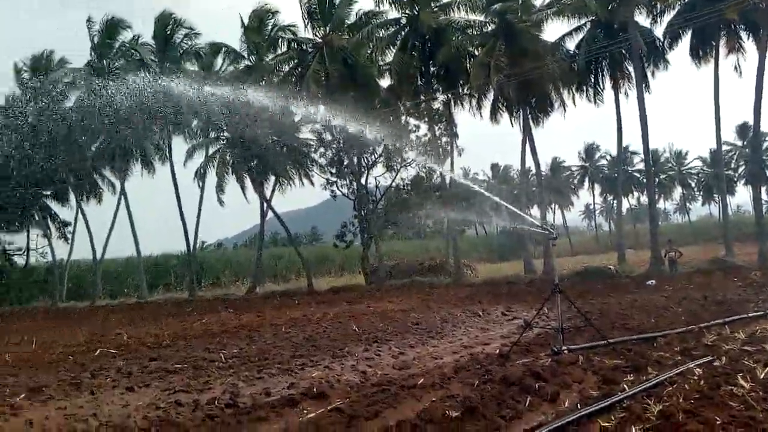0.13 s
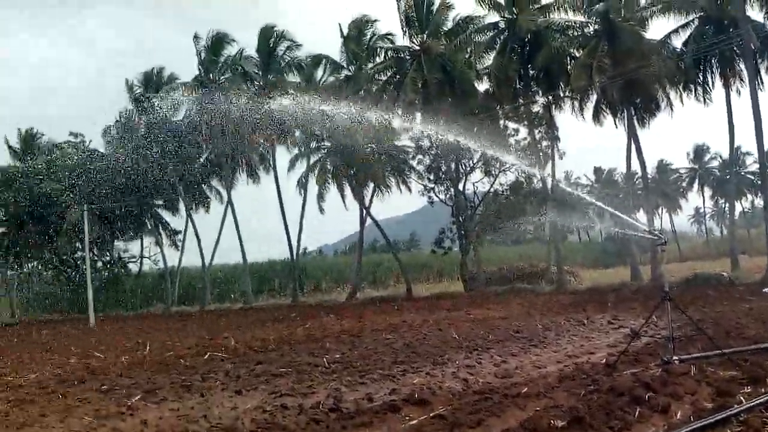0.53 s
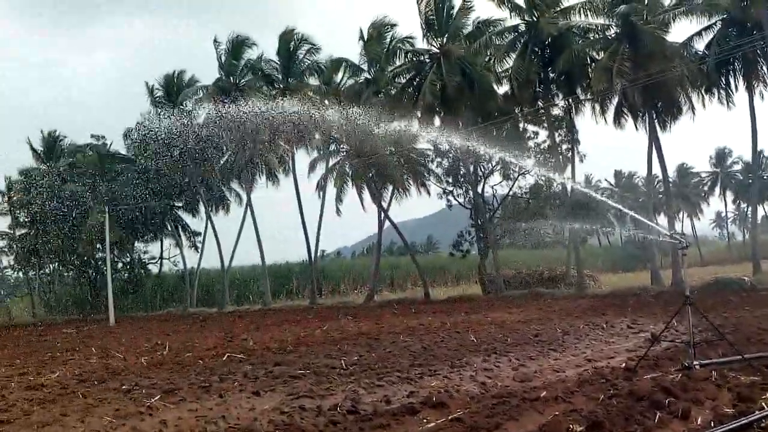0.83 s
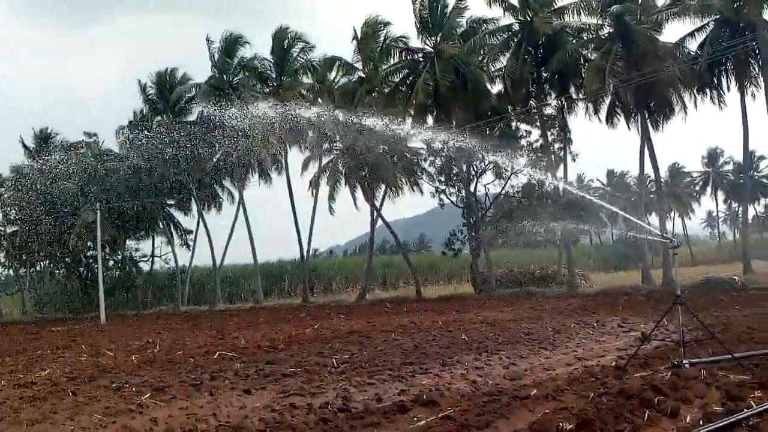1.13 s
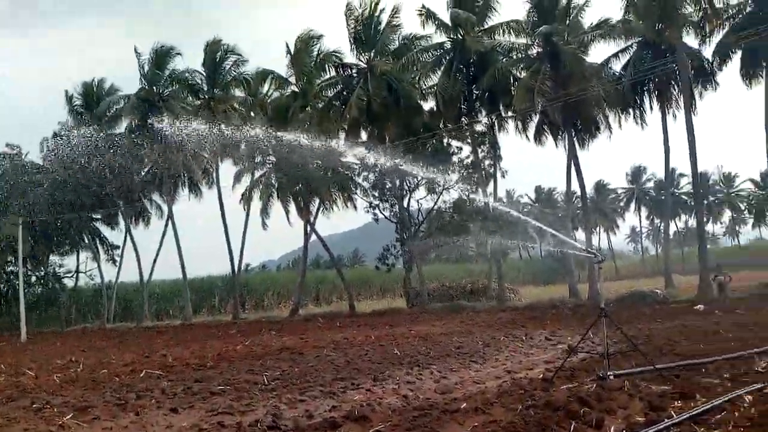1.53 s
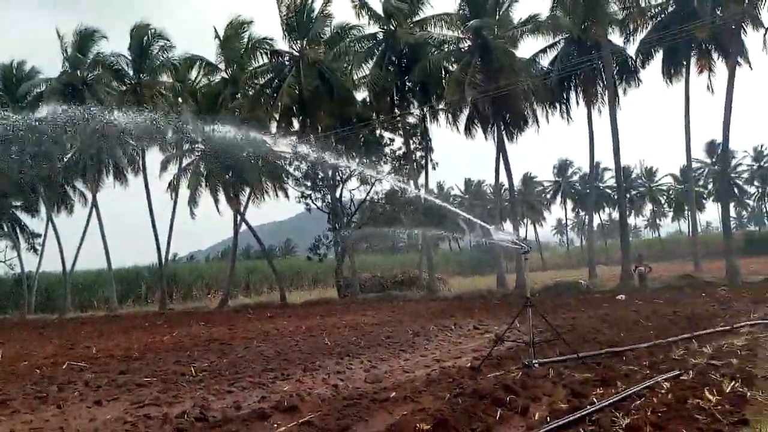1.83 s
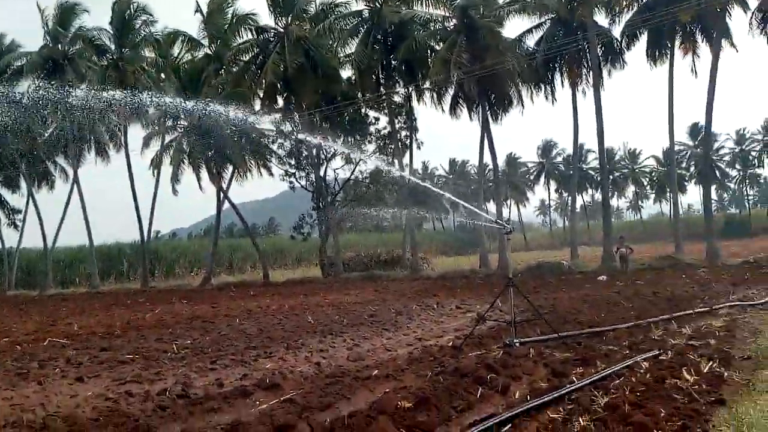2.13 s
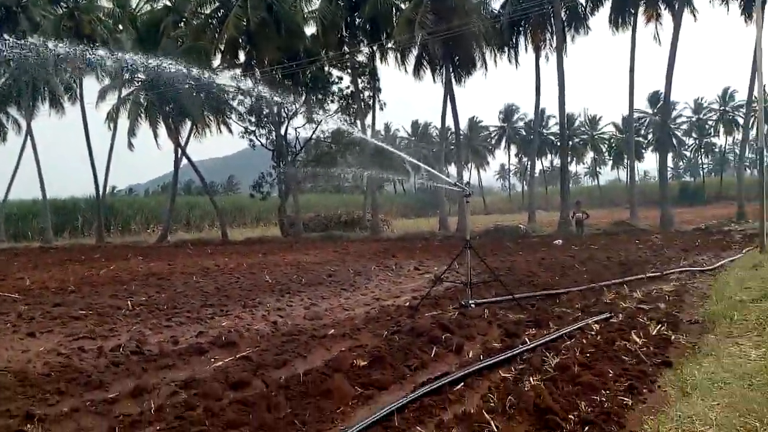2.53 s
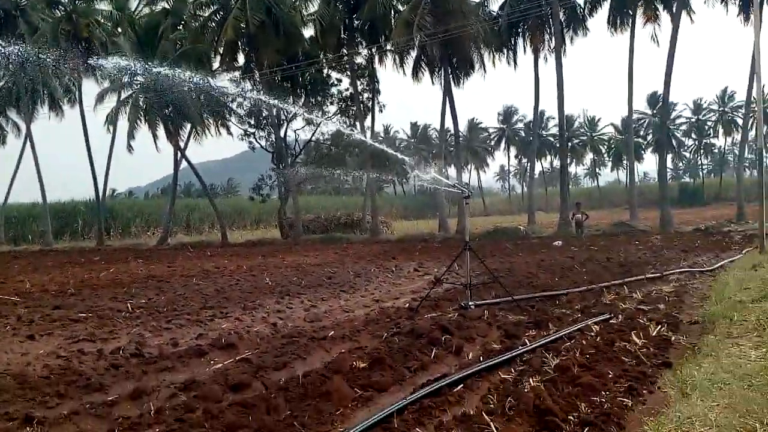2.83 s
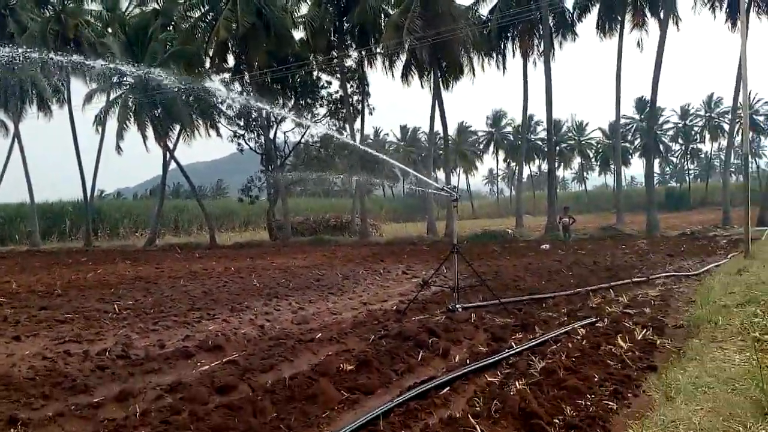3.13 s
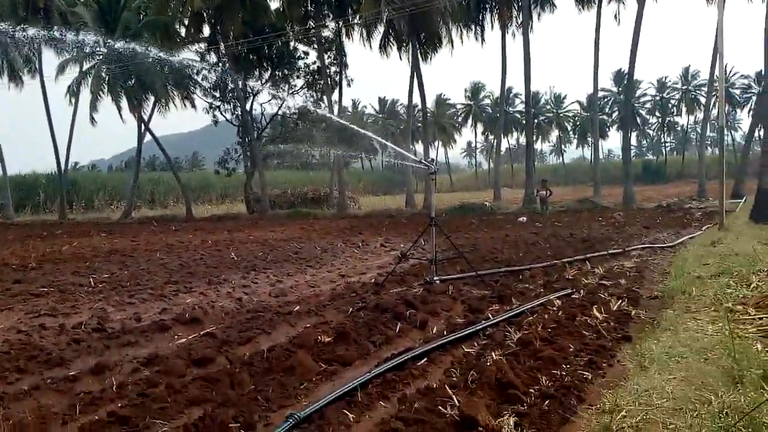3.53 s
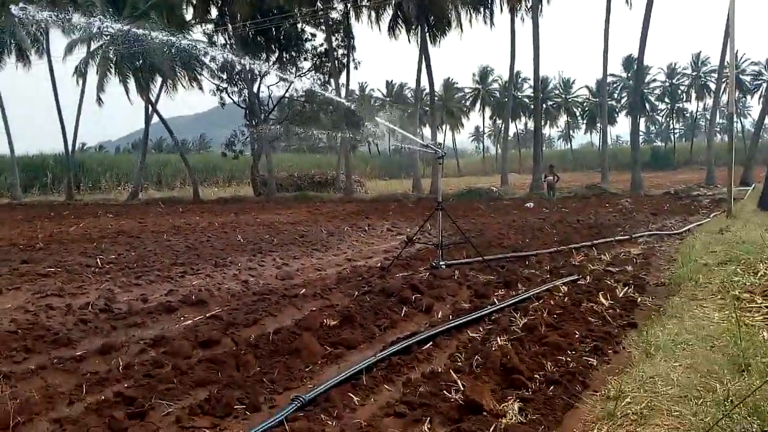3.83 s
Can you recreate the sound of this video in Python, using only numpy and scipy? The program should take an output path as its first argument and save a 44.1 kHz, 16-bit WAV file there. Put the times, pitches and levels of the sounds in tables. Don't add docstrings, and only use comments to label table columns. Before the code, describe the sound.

A large field sprinkler knocks steadily from about 0.5 s, every half second, eight bright metallic clacks of varying hardness, each with a quick rattle and wet splash, the last near 3.8 s. Spray hisses throughout, slowly fading, with small drops ticking, mostly early. Wind rumbles and flaps on both sides, strongest on the right after 2.7 s. A faint far bird chirps at 0.1 and 2.8 s.

```python
import sys
import numpy as np
from scipy import signal
from scipy.fft import rfft, irfft
from scipy.io import wavfile
from scipy.ndimage import uniform_filter1d, map_coordinates

SR = 44100
rng = np.random.default_rng(int(sys.argv[2]) if len(sys.argv) > 2 else 0)


def unload_wav(signal):
    wavfile.write(
        sys.argv[1],
        SR,
        np.round(np.clip(np.atleast_2d(signal).T, -1, 1) * 32767).astype(np.int16),
    )


def boost_factor(decibels):
    exponent = np.asarray(decibels, float) / 20
    return 10 ** exponent


N = 176400

# start_s, level_db, tilt_db_per_octave, main_ring_db, barrel_ring_db
BLOWS = [
    (0.4612, -34, -7, -7, 6.5),
    (0.9421, -33, -2.5, 0, -1),
    (1.4252, -29.5, -2, 3.5, -1),
    (1.9012, -33.5, -5, 5, 3.5),
    (2.3841, -30.5, -4.5, 3.1, -0.36),
    (2.8632, -30, 3, -2.5, 1.5),
    (3.3472, -30.5, 0, 1.2, 2.5),
    (3.8203, -28.5, -1.5, -3, -4),
]
EARLIER_BLOW = (-0.08, -30.5, -9, -6, 4)
# lead_s, level_db
TOUCHES = [
    (.012, -50),
    (0.011, -56),
    (.012, -49),
    (.014, -47.5),
    (.011, -47),
    (0.014, -51),
    (0.015, -49),
    (.013, -50),
    (0.0066, -49.5),
]
# pitch_hz, blow_db, chatter_db, t60_s
ARM_MODES = [(987, -26, 2, 0.033), (1522, -28.5, -21, 0.023), (1783, -8, -23, 0.0271),
             (2123, -4.5, -3.5, 0.011), (3134, -17.5, -13, 0.064), (3410, -18.5, -24, 0.063),
             (4734, -9, -7, 0.02), (5100, -8.5, -10.5, 0.034), (6078, -11.5, -13, 0.049),
             (7260, -15, -25, 0.012)]
MAIN_RING = (4098.5, 7.5, -13, 0.0589)
BARREL_MODES = [(2440, -19.5, -9, 0.13), (2799.6, -22.5, -6.5, 0.16), (5480, -27, -19, 0.16)]
# freq_hz, density_db_per_hz
SPLASH_SPECTRUM = [(600, -24.5), (1000, -1.5), (1300, -3.5), (2600, 2), (4500, 5), (7000, -4),
                   (10000, -25.5), (14500, -16)]
# time_s, lag_s
GUN_LEFT_LAG = [(0, 0.000097), (4, 0.0000083)]
# time_s, level_db
SPRAY_LEVEL = [(0, -48.5), (.3, -46.5), (.7, -49), (1.2, -48.5), (2, -51), (3, -51.5), (4, -53)]
# freq_hz, density_db_per_hz
SPRAY_LEFT = [(500, -9.5), (2200, -10.5), (6000, -15.5), (8000, -20.5), (11000, -29.5), (13000, -32),
              (14300, -26), (15200, -26)]
SPRAY_RIGHT = [(600, -2), (1600, -7), (4000, -1.5), (7200, 1), (9500, -13), (11000, -16.5), (13300, -10.5),
               (14800, -3)]
# start_s, level_db, pitch_hz
DROPS = [(0.0406, -32, 6340), (0.0977, -34.5, 6730), (0.1456, -36, 4140), (0.42, -36, 4800),
         (0.5312, -45, 5720), (0.558, -41, 3740), (0.7385, -37, 7320), (0.8765, -40, 5670),
         (0.9068, -39, 5960), (0.7869, -38, 3940), (0.8172, -31, 4210), (1.0515, -50, 5450),
         (1.066, -38, 5850), (1.1246, -31.5, 6000), (1.2565, -38, 7330), (1.294, -37, 4100),
         (1.338, -44.5, 4150), (1.486, -43, 4200), (1.532, -41, 4190), (1.776, -37, 7200),
         (2.074, -44, 6520), (2.4817, -38.5, 5890), (2.6005, -40, 5460), (2.7464, -40.5, 3950),
         (2.9375, -48, 6300), (3.1344, -42.5, 3370), (3.2301, -45, 3180), (3.5868, -38.5, 3900),
         (3.9285, -49.5, 5590)]
# time_s, level_db
WIND_LEFT = [(0.01, -23.5), (0.39, -27), (1.19, -44), (1.33, -20.5), (1.57, -39), (1.69, -19), (1.85, -59),
             (1.93, -36), (1.99, -59), (2.09, -35.5), (2.25, -54), (2.89, -41), (2.97, -51.5), (3.33, -47),
             (3.45, -65), (3.59, -34), (3.83, -53), (3.99, -57)]
WIND_RIGHT = [(0.01, -23), (0.07, -21.5), (0.17, -31.5), (0.61, -32), (0.75, -24.5), (1.21, -45),
              (1.39, -43), (1.59, -24), (1.97, -21), (2.11, -38.5), (2.25, -26), (2.43, -41.5), (2.81, -14),
              (2.91, -13), (3.09, -41.5), (3.25, -17), (3.59, -27), (3.99, -16)]
# centre_s, extra_db, half_length_s
BUFFETS_LEFT = [(0.259, 6.5, 0.03), (0.662, 12.5, 0.046), (0.795, 8, 0.024), (0.918, 10, 0.011),
                (0.99, -14, 0.02), (1.307, 12.5, 0.017), (1.455, 7, 0.061), (2.29, -4, 0.037),
                (2.595, -13, 0.019), (2.643, 9, 0.027), (3.694, -2, 0.025)]
BUFFETS_RIGHT = [(0.329, 8, 0.0121), (.89, -3.5, 0.026), (1.13, -4, 0.019), (2.234, -12.5, 0.014),
                 (2.254, 14.5, 0.005), (2.62, 6.5, 0.016), (2.688, -9.5, 0.038), (2.858, -9, 0.03),
                 (2.921, 8.5, 0.0036), (2.947, -17.5, 0.013), (3.16, 3, 0.048), (3.732, 6.5, 0.021),
                 (3.976, -6.5, 0.0082)]
# freq_hz, density_db_per_hz
EDDIES = [(20, -32), (43, -4.5), (90, 3.5), (200, -4), (300, -11.5), (450, -24), (650, -34.5), (1200, -74)]
# start_s, level_db, left_minus_right_db, eddy_pitch_hz
SLAPS = [(0.074, -31, -8.5, 261), (0.103, -36, 5.5, 261), (0.175, -26, 18.5, 314), (0.218, -30, 14.5, 266),
         (0.269, -26, 12.5, 297), (0.521, -46, 9.0, 326), (0.581, -36.5, 13.5, 315),
         (0.624, -27.5, 14.0, 261), (0.646, -29.5, 13.0, 306), (0.732, -41, -14.5, 310),
         (0.766, -42, 1.5, 382), (1.239, -43, 15.5, 347), (1.27, -29, 31.5, 441), (1.29, -20.5, 42.5, 340),
         (1.582, -27, -6.5, 260), (1.613, -20.5, 6.0, 264), (1.683, -24.5, 15.5, 296),
         (1.79, -30, -28.0, 261), (1.816, -32.5, -37.0, 258), (1.847, -33, -38.5, 328),
         (1.978, -41, -34.0, 296), (2.062, -41, -16.5, 318), (2.246, -30.5, -37.0, 264),
         (2.313, -36.5, -28.5, 364), (2.59, -36.5, -31.0, 272), (2.712, -34.5, -23.0, 294),
         (2.764, -21, -48.0, 277), (2.853, -31, -26.0, 339), (2.883, -24, -30.5, 313),
         (2.908, -22, -45.5, 372), (2.955, -39.5, -32.5, 371), (2.97, -27, -41.5, 417),
         (2.996, -32, -35.0, 260), (3.14, -39, -27.5, 354), (3.282, -23, -43.5, 263),
         (3.332, -18, -37.0, 333), (3.359, -21, -32.0, 272), (3.42, -23, -50.0, 341),
         (3.474, -31.5, -40.0, 320), (3.506, -33.5, -23.0, 277), (3.599, -38, -18.5, 334),
         (3.676, -38, -18.5, 261), (3.702, -36, -35.5, 261), (3.769, -18.5, -50.0, 324),
         (3.824, -23, -28.5, 291), (3.885, -18, -48.0, 338), (3.919, -21, -51.5, 331),
         (3.969, -26.5, -42.5, 262)]
# start_s, length_s, start_hz, end_hz, level_db
BIRD = [
    (.113, .035, 4000, 3500, -55),
    (.165, .09, 2930, 2850, -59),
    (2.768, .045, 3900, 3600, -60),
    (2.815, .12, 3050, 2830, -61),
]

BLOW_RISE_S, BLOW_DB, SPREAD_DB = 0.006, 4.5, 4.5
REBOUND_S, REBOUND_DB = 0.0045, -3.5
MAIN_REBOUND_LOSS_DB = 12
CHATTER_PER_S, CHATTER_DB, CHATTER_START_S, CHATTER_T60_S = 2500, -18.5, 0.012, 0.094
SPLASH_DB, SPLASH_T60_S, SPLASH_LEAD_DB, SPLASH_HOLD_S = -13, 0.1, -11, 0.042
GUN_LEFT_DB, GUN_LEFT_CUT_HZ, GUN_RIGHT_DB = -2.5, 1770, -0.5
PATCHY_DB, PATTER_PER_S, PATTER_SIZE_DB, PATTER_DB = 1.35, 400, 3.5, -5
DROP_T60_CYCLES, DROP_DB, DROP_LEFT_DB = 10, 3, -9
BRIGHTEN_DB_PER_OCT, MEAN_WIND_DB = 0.2566, -26.5
LUMPS_DB, LUMPS_HZ, LUMP_TILT_PER_OCT, OWN_DB = 2, 42.3, 0.37, 1.3
EVEN_CYCLES, EVEN_SHARE = 4.97, 0.5
SLAP_DB, SLAP_T60_S, SLAP_RISE_S = 0.14, 0.038, 0.0044
SLAP_LOW_RATIO, SLAP_HIGH_RATIO = 0.43, 1.436
BIRD_LEFT_DB = -9
LIMIT_DB, LIMIT_SHARE, RECOVER_DB_PER_S, CUTOFF_HZ = -9, 0.6, 150, 15900


def in_time(rows):
    return np.interp(np.arange(N) / SR, *np.transpose(rows))


def at_hz(points, hz):
    table_hz, db = np.transpose(points)
    return np.interp(np.log(hz), np.log(table_hz), db)


def rms_one(x):
    return x / np.sqrt(np.mean(x ** 2) + 1e-20)


def drift(rate_hz):
    pole = np.exp(-2 * np.pi * rate_hz * 20 / SR)
    noise = rng.standard_normal(N // 20 + 2002)
    slow = signal.lfilter([1], [1, -2 * pole, pole * pole], noise)[2000:]
    return np.interp(np.arange(N) / 20, np.arange(len(slow)), rms_one(slow))


def ring(clicks, hz, t60_s):
    r, w = boost_factor(-60 / (t60_s * SR)), 2 * np.pi * hz / SR
    return signal.lfilter([0, np.sin(w)], [1, -2 * r * np.cos(w), r * r], clicks + 1e-18)


def band_pass(x, order, low_hz, high_hz):
    return signal.sosfilt(signal.butter(order, [low_hz, high_hz], "band", fs=SR, output="sos"), x)


def bank(sources, low_hz, count):
    edges = low_hz * 2 ** (np.arange(count + 1) / 2)
    return [(np.sqrt(low * high), band_pass(sources[k % 2], 3, low, high)[-N:])
            for k, (low, high) in enumerate(zip(edges, edges[1:]))]


def coloured(x, spectrum):
    size = x.shape[-1]
    gain = boost_factor(at_hz(spectrum, np.fft.rfftfreq(size, 1 / SR) + 1))
    return irfft(rfft(x) * gain, size)


def arm():
    lead = SR // 10
    blows = np.array([EARLIER_BLOW] + list(BLOWS))
    at = (blows[:, 0] * SR).astype(int) + lead
    t = np.arange(SR // 5) / SR
    after, barrel, wet, out = np.zeros((4, N + 2 * lead + len(t)))
    size = int(BLOW_RISE_S * SR)
    touches = [(int(lead_s * SR), db) for lead_s, db in TOUCHES]

    for i, (_, db, _, _, barrel_db), (early, _) in zip(at, blows, touches):
        barrel[i - size:i + len(t)] = boost_factor(barrel_db)
        shared = boost_factor(0.5 * db - 12)
        after[i:i + len(t)] += shared * boost_factor(-60 * t / CHATTER_T60_S) * np.clip(t / CHATTER_START_S, 0, 1)
        late_s = np.maximum(t - SPLASH_HOLD_S, 0)
        wet[i:i + len(t)] += shared * boost_factor(-100 * t - 60 * late_s / SPLASH_T60_S)
        wet[i - early:i] += shared * boost_factor(SPLASH_LEAD_DB)

    chatter = after * (rng.random(len(after)) < CHATTER_PER_S / SR)
    rebounds = (REBOUND_S * SR * rng.uniform(0.684, 1.3, len(at))).astype(int)
    for mode in ARM_MODES + [MAIN_RING] + BARREL_MODES:
        hz, blow_db, chatter_db, t60_s = mode
        is_main = mode is MAIN_RING
        clicks = chatter * rng.standard_normal(len(after)) * boost_factor(CHATTER_DB + chatter_db)
        push = np.hanning(size) * np.cos(2 * np.pi * hz * np.arange(size) / SR) * 4 / size
        for i, (_, db, tilt_db, main_db, _), later, (early, touch_db) in zip(
                at - size // 3, blows, rebounds, touches):
            hit_db, first_db, back_db = rng.normal(0, SPREAD_DB, 3)
            if is_main:
                hit_db, first_db, back_db = 0, 0, -MAIN_REBOUND_LOSS_DB
            level_db = db + BLOW_DB + blow_db + tilt_db * np.log2(hz / 3000) + main_db * is_main
            hit = push * boost_factor(level_db)
            clicks[i:i + size] += hit * boost_factor(hit_db)
            clicks[i + later:i + later + size] += hit * boost_factor(REBOUND_DB + back_db)
            clicks[i - early:][:size] += push * boost_factor(touch_db + blow_db + first_db)
        out += ring(clicks * (barrel if mode in BARREL_MODES else 1), hz, t60_s)

    grain_gain = boost_factor(3 * rng.standard_normal(len(out) // 64 + 1)).repeat(64)[:len(out)]
    grains = rng.standard_normal(len(out)) * grain_gain
    splash = rms_one(coloured(grains, SPLASH_SPECTRUM)) * wet * boost_factor(SPLASH_DB)
    return (out + splash)[lead:lead + N]


def shaded(x):
    late = map_coordinates(x, [np.arange(N) - in_time(GUN_LEFT_LAG) * SR], order=3)
    return boost_factor(GUN_LEFT_DB) * signal.lfilter(*signal.butter(1, GUN_LEFT_CUT_HZ, fs=SR), late)


def spray(colour):
    sizes = boost_factor(PATTER_SIZE_DB * np.minimum(rng.exponential(1, (2, N)), 5))
    signed = sizes * rng.choice([-1, 1], (2, N))
    patter = rms_one(signed * (rng.random((2, N)) < PATTER_PER_S / SR))
    hiss = rng.standard_normal((2, N))
    together = drift(25)
    bands = bank(coloured(hiss + boost_factor(PATTER_DB) * patter, colour), 400, count=11)
    patchy = sum(band * boost_factor(PATCHY_DB * (together + drift(9.7))) for _, band in bands)
    return boost_factor(in_time(SPRAY_LEVEL)) * patchy


def drops():
    t = np.arange(400) / SR
    out = np.zeros(N + len(t))
    for start_s, db, hz in DROPS:
        decay = boost_factor(db + DROP_DB - 60 * t * hz / DROP_T60_CYCLES)
        out[int(start_s * SR):][:len(t)] += decay * np.sin(2 * np.pi * hz * t * (1 + 40 * t))
    return out[:N]


def wind(gusts, buffets):
    t = np.arange(N) / SR
    level_db = in_time(gusts)
    for centre_s, extra_db, half_s in buffets:
        level_db = level_db + extra_db * np.exp(-0.5 * ((t - centre_s) / half_s) ** 2)
    lumps = LUMPS_DB * drift(LUMPS_HZ)
    lumps = lumps - uniform_filter1d(lumps, size=SR // 12)
    out, power = 0, 0
    for hz, band in bank(rng.standard_normal((2, N + SR // 4)), 18, count=13):
        swell = uniform_filter1d(band ** 2, size=int(EVEN_CYCLES * SR / hz)) / np.mean(band ** 2) + 1e-3
        band = band * swell ** (-EVEN_SHARE / 2)
        octaves = np.log2(hz / 100)
        db = at_hz(EDDIES, hz) + BRIGHTEN_DB_PER_OCT * (level_db - MEAN_WIND_DB) * octaves
        lump_db = lumps * (1 + LUMP_TILT_PER_OCT * octaves) + OWN_DB * drift(9.5)
        out = out + band * boost_factor(db + lump_db)
        power = power + boost_factor(2 * db) * np.mean(band ** 2)
    return out / np.sqrt(power) * boost_factor(level_db - 1.0)


def slaps():
    t = np.arange(SR // 10) / SR
    out = np.zeros((2, N + len(t)))
    shape = boost_factor(-60 * t / SLAP_T60_S) * np.clip(t / SLAP_RISE_S, 0, 1)
    for start_s, db, pan_db, hz in SLAPS:
        noise = rng.standard_normal(len(t))
        puff = band_pass(shape * noise, 4, SLAP_LOW_RATIO * hz, SLAP_HIGH_RATIO * hz)
        port = int(pan_db < 0)
        out[port, int(start_s * SR):][:len(t)] += boost_factor(db + SLAP_DB) * 2 * puff / np.abs(puff).max()
    return out[:, :N]


def bird():
    out = np.zeros(N)
    for start_s, length_s, start_hz, end_hz, db in BIRD:
        size = int(length_s * SR)
        phase = 2 * np.pi * np.cumsum(np.linspace(start_hz, end_hz, size)) / SR
        out[int(start_s * SR):][:size] += boost_factor(db) * np.hanning(size) ** 0.5 * np.sin(phase)
    return out


def scene():
    gun, ticks, song = arm(), drops(), bird()
    left = shaded(gun) + spray(SPRAY_LEFT) + boost_factor(DROP_LEFT_DB) * ticks
    left = left + wind(WIND_LEFT, BUFFETS_LEFT) + boost_factor(BIRD_LEFT_DB) * song
    right = boost_factor(GUN_RIGHT_DB) * (gun + ticks) + spray(SPRAY_RIGHT)
    right = right + wind(WIND_RIGHT, BUFFETS_RIGHT) + song
    return np.array([left, right]) + slaps()


def roll_off(x):
    return signal.sosfilt(signal.butter(12, 16790, fs=SR, output="sos"), x)


def record(dry):
    slope = RECOVER_DB_PER_S * np.arange(N) / SR
    over_db = np.maximum(20 * np.log10(np.abs(dry) + 1e-9) - LIMIT_DB, 0)
    held_db = np.maximum.accumulate(over_db + slope, axis=1) - slope
    duck = boost_factor(-LIMIT_SHARE * uniform_filter1d(held_db, size=128, axis=1))
    low_passed = signal.sosfilt(signal.cheby2(16, 50, CUTOFF_HZ, fs=SR, output="sos"), dry)
    return roll_off(low_passed * duck)


dry = scene()
out = record(dry)
unload_wav(out)
```